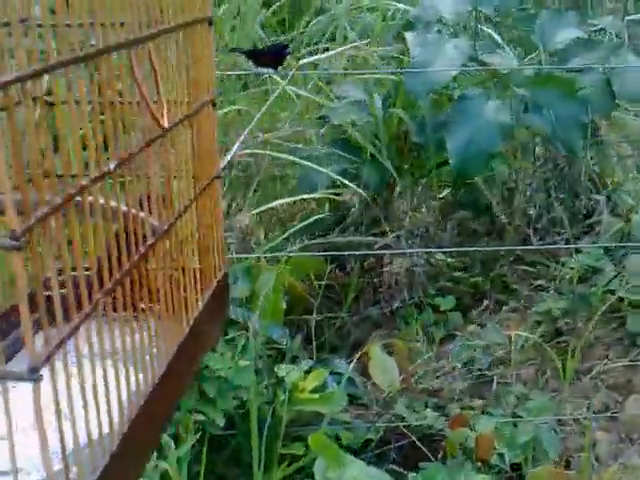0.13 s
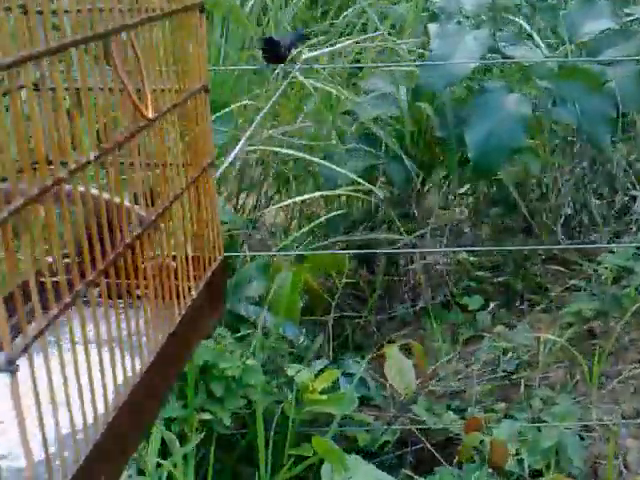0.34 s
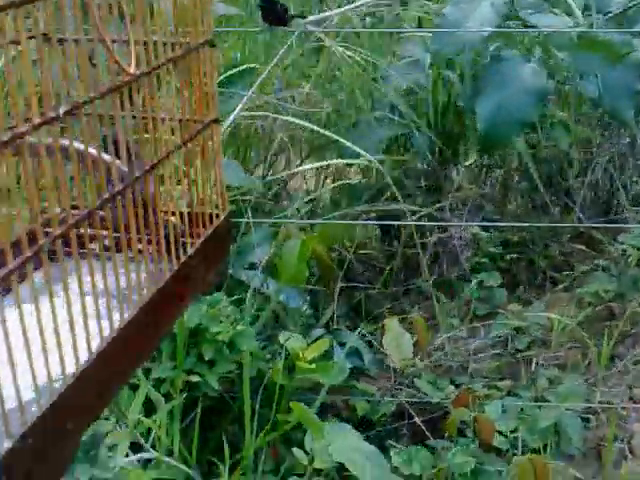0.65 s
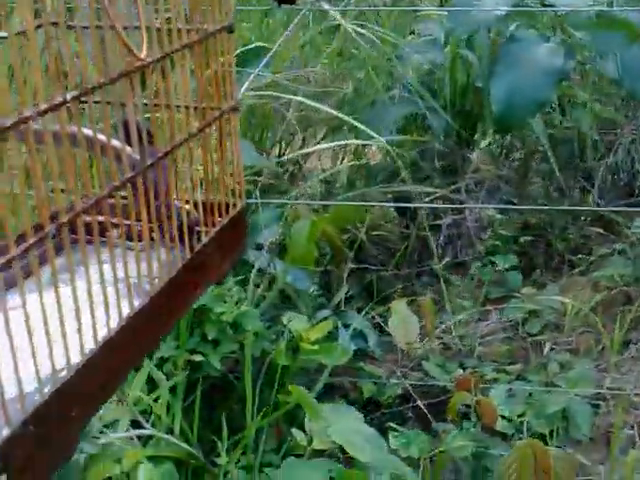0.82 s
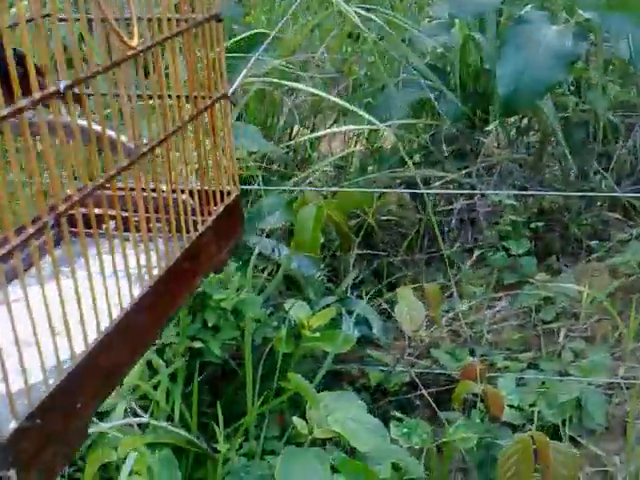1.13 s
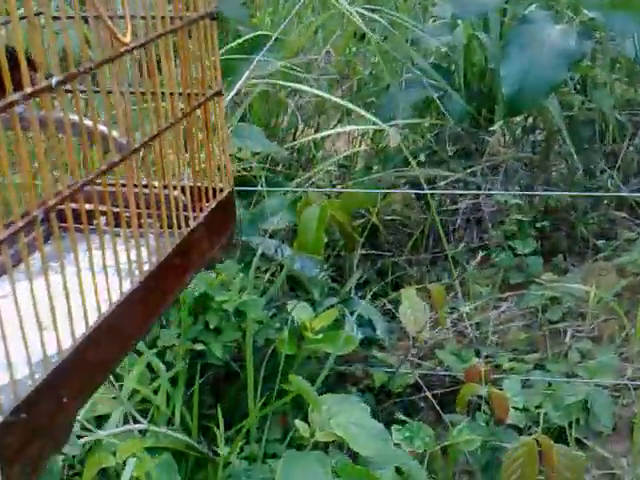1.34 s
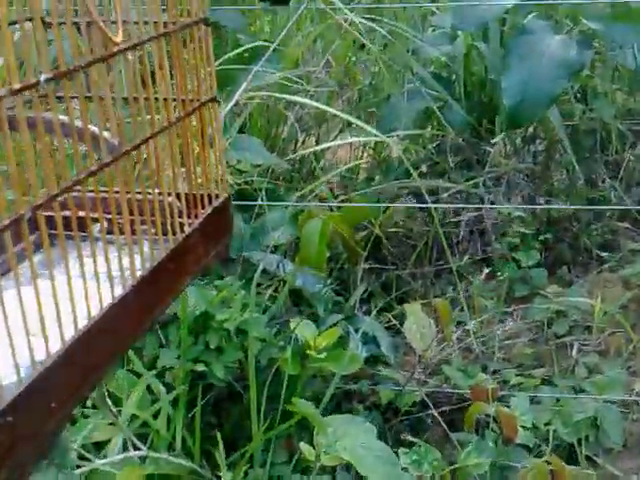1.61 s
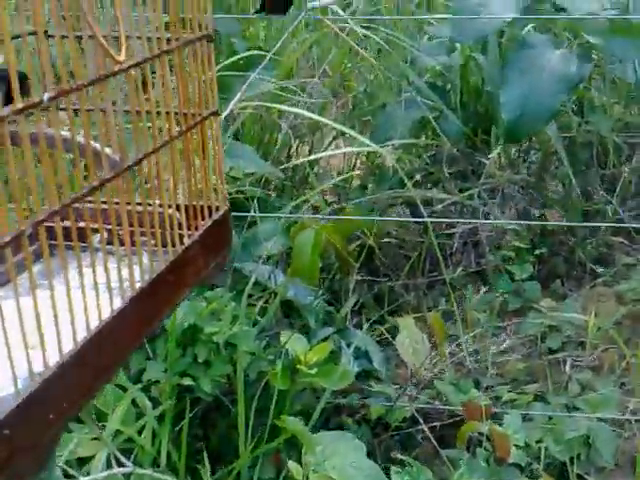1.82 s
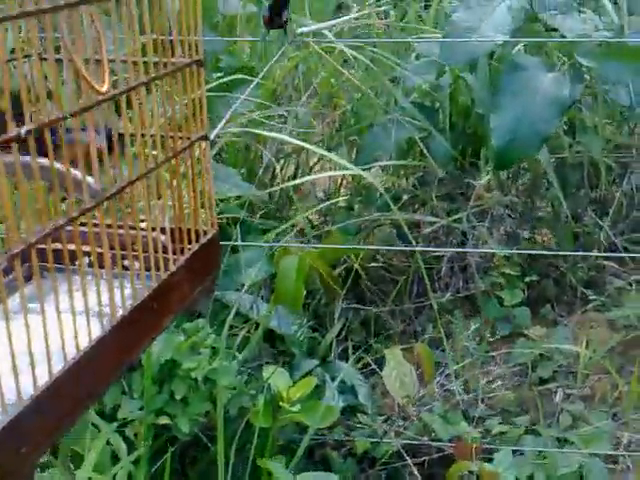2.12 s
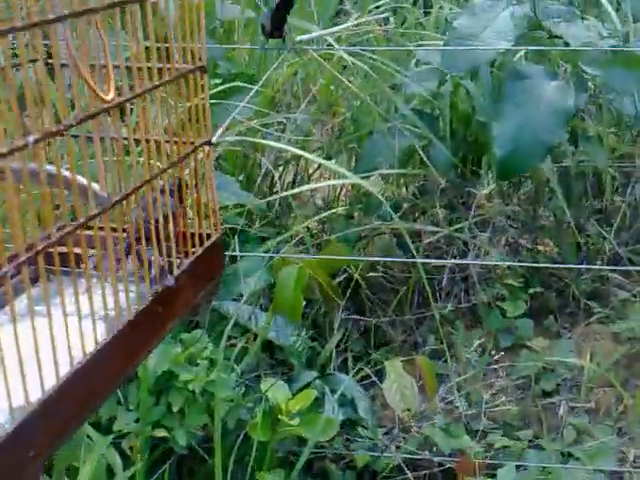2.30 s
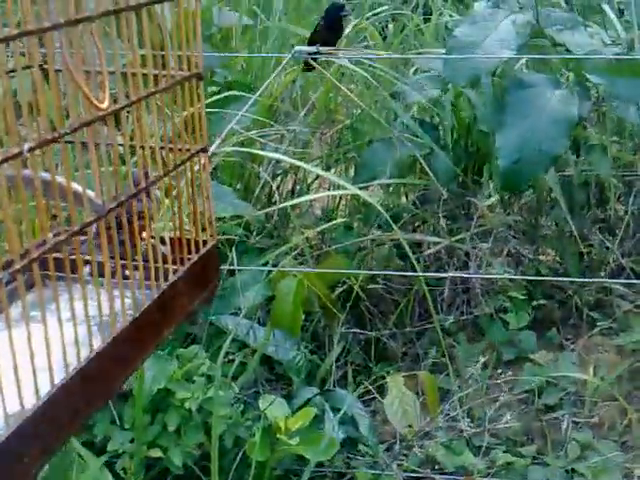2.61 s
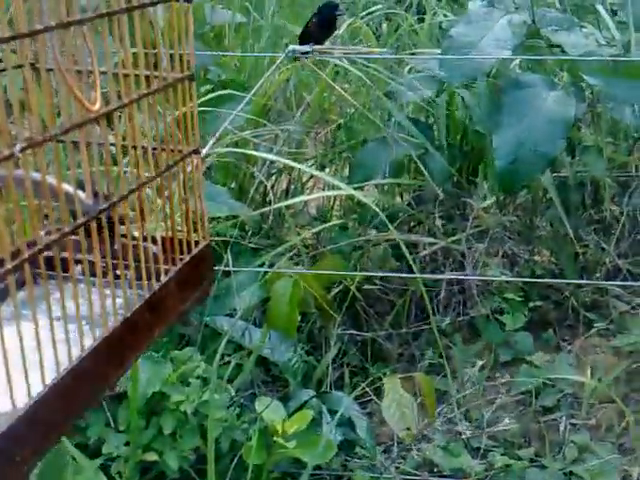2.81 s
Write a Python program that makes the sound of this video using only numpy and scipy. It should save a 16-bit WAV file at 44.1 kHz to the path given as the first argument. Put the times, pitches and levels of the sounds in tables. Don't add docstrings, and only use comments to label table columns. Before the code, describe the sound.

Outdoors in a quiet field, sharp raspy chirps come in bursts of three, four and three, with low wind buffeting after the first, light cage ticks later, faint high whistles and a cricket trill.

```python
import sys
import numpy as np
from scipy import signal
from scipy.fft import rfft, irfft, next_fast_len
from scipy.io import wavfile
from scipy.ndimage import uniform_filter1d, map_coordinates

SR = 44100
rng = np.random.default_rng(int(sys.argv[2]) if len(sys.argv) > 2 else 0)


def wav_out(sig):
    wavfile.write(sys.argv[1], SR, np.round(np.clip(np.atleast_2d(sig).T, -1, 1) * 32767).astype(np.int16))


def natural_amplitude(level_db):
    exponent = np.asarray(level_db, float) / 20
    return 10 ** exponent


N = 130095

# time in seconds, pitch in Hz, buzz level in dB, #
# dulling of the upper partials in dB per octave, level of the leaking air in dB.
FIRST_CHIPS = [
    [(.211, 2190, -30, -4, -20), (.219, 1751, -26.5, 5, -30.5), (.236, 1091, -28.5, 18, -28.5),
     (.25, 774, -33.5, 18, -37), (.264, 488, -48.5, 14, -45)],
    [(.361, 2000, -32, -7, -32), (.379, 1520, -27.5, -5, -26.5), (.393, 1616, -20.5, 7, -27),
     (.399, 1303, -27, -3, -30), (.409, 1265, -34, 11, -28.5), (.42, 808, -35.5, 32, -36),
     (.432, 435, -58, 11, -36)],
    [(.512, 1240, -40, 5, -62), (.52, 1311, -40, 1, -54), (.545, 1160, -30, -4.5, -32),
     (.561, 1532, -24, 28.5, -23.5), (.573, 1016, -34, 18, -27.5), (.592, 584, -57, -3, -38.5)],
]
SECOND_CHIPS = [
    [(1.147, 2110, -32.5, 0.41, -51), (1.158, 1868, -23, 2, -24), (1.168, 1574, -27, 2.3, -26.5),
     (1.187, 1303, -30.5, 0, -31), (1.203, 1410, -34, 0, -32), (1.219, 2060, -38, 1.8, -33.5)],
    [(1.291, 1750, -33, 4, -23), (1.303, 1525, -30.5, 13, -30), (1.311, 1585, -26.5, -5.5, -30),
     (1.337, 1073, -31.5, 1.5, -33.5), (1.355, 984, -32.5, 18, -34), (1.376, 1095, -43.5, 7, -57),
     (1.391, 1960, -39.5, 3, -58)],
    [(1.455, 1458, -42, 0.75, -29.5), (1.473, 1203, -31.5, 0.67, -33), (1.483, 1101, -33.5, 21, -31.5),
     (1.501, 873, -36.5, 30, -34), (1.52, 441, -46.5, 28, -39.5)],
    [(1.609, 1288, -46.5, 6.2, -74), (1.625, 1144, -42.5, 6, -50), (1.64, 1020, -33, 2.9, -34),
     (1.66, 969, -36, 33, -35), (1.668, 699, -42, 22, -33), (1.685, 455, -58, 9.1, -41.5)],
]
THIRD_CHIPS = [
    [(2.319, 1980, -27.5, 2.3, -34), (2.331, 1434, -30.5, 17, -24.5), (2.343, 950, -29.5, 14.5, -31.5),
     (2.362, 468, -50, 17, -44)],
    [(2.464, 2334, -43, -4, -55), (2.473, 1406, -42, -8.5, -55), (2.485, 1150, -42.5, -4, -43),
     (2.497, 949, -27.5, 2, -30.5), (2.514, 825, -32, 11, -34.5), (2.527, 635, -40, 41, -29.5),
     (2.54, 456, -50, 25, -40.5)],
    [(2.634, 1583, -47.5, 2.5, -68), (2.65, 1167, -37, 0.67, -47), (2.666, 1072, -39, 5.1, -31.5),
     (2.68, 1087, -32.5, 19, -27.5), (2.696, 902, -36, 14, -27.5), (2.715, 457, -53.5, 8.6, -37.5)],
]
# time in seconds, half-pitch lines in dB.
BREAKS = [
    (.25, -11),
    (0.395, -6.5),
    (.555, -10.5),
    (1.23, -20),
    (1.399, -20),
    (1.5, -19),
    (1.659, -5.5),
    (2.345, -13),
    (2.525, -12),
    (2.685, -8.5),
]
# time in seconds, peak level in dB.
SNAPS = [
    (0.2096, -16),
    (0.3601, -14),
    (1.1458, -10),
    (1.289, -12),
    (1.4536, -15),
    (2.317, -10),
]
# time in seconds, level in dB.
SEEPING_AIR = [
    [(.26, -44.5), (.36, -40.5)],
    [(.98, -63.5), (1.145, -43)],
    [(1.22, -61), (1.29, -41)],
]
# frequency in Hz, gain in dB.
CAVITY = [(450, 5), (1000, 0), (1700, 8), (3000, -8), (4300, -1), (6300, -4), (8500, -13), (11500, -8)]
# frequency in Hz, level in dB per Hz.
HISS = [(400, -18.5), (2900, -10.5), (3900, -6.5), (6300, -2.5), (8500, -8), (12100, 1), (13700, -9),
        (15500, -9.5)]
# frequency in Hz, gain in dB.
TIGHT_SLIT = [(6500, -6), (9000, 0)]
# time in seconds, pitch in Hz, level in dB.
WHISTLES = [
    [(0, 5800, -68), (.07, 4400, -57.5), (.125, 4005, -72), (.142, 3900, -45), (.3, 3210, -44),
     (.365, 3020, -42.5), (.378, 2950, -62)],
    [(.6, 4550, -59), (.632, 4130, -55), (.641, 4000, -53), (.652, 3880, -44.5), (.704, 3587, -47),
     (.735, 3300, -59), (.752, 2880, -67)],
    [(2.528, 4200, -45), (2.538, 3700, -44), (2.547, 3600, -74)],
    [(2.714, 3800, -47), (2.722, 3650, -43.5), (2.73, 3580, -58)],
    [(2.76, 1460, -78), (2.95, 1620, -74)],
]
# time in seconds, peak level in dB, ring in Hz, second ring in Hz.
TICKS = [(1.256, -34.5, 720, 2950), (1.26, -36, 1480, 4160), (1.276, -33.5, 810, 1570),
         (1.731, -43, 4220, 1800), (1.747, -43, 3260, 1490), (1.811, -42.5, 3930, 1450),
         (1.928, -48, 1500, 4060), (1.95, -42.5, 1250, 2170), (2.055, -29, 1555, 4300),
         (2.131, -39, 1615, 2400), (2.175, -48.5, 1090, 1820), (2.252, -36.5, 1140, 2580),
         (2.287, -37.5, 620, 293), (2.376, -45, 1490, 3870), (2.403, -43, 3200, 3540),
         (2.418, -41.5, 3340, 3930), (2.432, -39.5, 1100, 3100), (2.785, -47, 540, 500),
         (2.842, -48, 3370, 5470)]
# time in seconds, level in dB.
WIND = [(0, -64), (.13, -52.5), (.3, -55), (.42, -38), (.6, -27), (.72, -28), (.78, -36), (.93, -40.5),
        (.98, -33.5), (1.35, -34.5), (1.55, -46), (1.78, -55), (2.1, -65.5), (2.2, -51.5), (2.45, -69.5),
        (2.65, -58.5), (2.95, -61)]
# frequency in Hz, level in dB per Hz.
RUMBLE = [(12, -26), (30, 1), (60, 3.5), (134, -7.5), (290, -27), (700, -41.5), (1200, -100)]
# time in seconds, peak level in dB, length in seconds,
# lean without unit (-1 suck, 0 suck then push, 1 push).
SLAPS = [(.3755, -20.5, 0.0045, -0.63), (.4674, -16, 0.0021, 0.61), (.571, -21, 0.002, 0.85),
         (.579, -17, 0.0031, -1.1), (.6095, -31, 0.0038, -0.36), (.6455, -21, .0017, -0.91),
         (.6528, -21.5, 0.0027, 0.11), (.6665, -16, 0.0024, -0.42), (.674, -21.5, 0.0015, -0.24),
         (.6822, -10.5, 0.0021, -0.015), (.6945, -25.5, 0.007, -1.34), (.8245, -14.5, 0.003, 0.1),
         (.8506, -15.5, 0.0033, 1), (.8567, -18, .003, 0), (.8648, -19, 0.0037, -0.74),
         (.976, -21.5, 0.0021, -0.82), (1.0265, -22.5, 0.0033, .5), (1.0766, -22.5, .0025, -0.36),
         (1.2585, -27.5, 0.0013, -0.58), (1.334, -21.5, 0.0036, -0.11), (1.362, -25, 0.005, -0.25),
         (1.438, -25, 0.0037, -0.057), (1.463, -21.5, 0.0035, -0.76), (1.586, -33, 0.0071, -0.12),
         (2.19, -40.5, 0.0062, 0.15)]
# time in seconds, pitch in Hz, level in dB.
CRICKET = [
    (.45, 7480, -65),
    (.65, 7220, -51.5),
    (.9, 7450, -63.5),
    (1.4, 7520, -63),
    (1.75, 7560, -53.5),
    (2.2, 7525, -45),
    (2.6, 7500, -46),
    (2.95, 7530, -50.5),
]
# frequency in Hz, level in dB.
CHORUS = [(6600, -12), (7350, 22), (8200, -53)]
# frequency in Hz, level in dB per Hz.
HUSH = [(200, -20), (330, -24.5), (620, -29), (1600, -25), (3000, -28), (5400, -28.5), (9000, -30),
        (16000, -31)]
# time in seconds, level in dB.
AIR = [(0, -59), (.2, -55), (1.6, -52.5), (2.95, -56)]


def unit(x):
    return x / np.sqrt(np.mean(x ** 2) + 1e-20)


def along(points, hz):
    f, v = np.transpose(points)
    return np.interp(np.log(hz + 1), np.log(f + 1), v)


def curves(rows):
    s, *cols = np.transpose(rows)
    t = np.arange(N) / SR
    gate = np.clip(np.minimum(t - s[0], s[-1] - t) / 0.00047, 0, 1)
    return [np.interp(t, s, c) for c in cols] + [gate]


def wobble(rate):
    points = rng.standard_normal(int(N * rate / SR) + 4)
    return map_coordinates(points, [np.arange(N) * rate / SR])


def coloured(x, spectrum):
    m = next_fast_len(N + 8192)
    gain = natural_amplitude(along(spectrum, np.fft.rfftfreq(m, 1 / SR)))
    return irfft(rfft(x, m) * gain, m)[:N]


def place(events, shape):
    out = np.zeros(N + SR)
    for row in events:
        v = shape(*row[1:])
        out[round(row[0] * SR):][:len(v)] += v
    return out[:N]


def snap(db):
    t = np.arange(200) / SR
    rise_s = .0003
    signs = np.sign(rng.standard_normal(len(t)))
    return natural_amplitude(db - 4) * signs * t / rise_s * np.exp(1 - t / rise_s)


def chips():
    jitter, ragged, break_s = .0015, 15, .008
    tail_s, glide_s, fade_s = .008, .007, .011
    buzz = np.zeros(N)
    k = np.arange(1, 33)[:, None] / 2
    hiss = rng.standard_normal(N)
    slip, shimmer, sputter = wobble(500), wobble(400), wobble(250)
    fray = 1.5 * np.array([wobble(45) for _ in k])
    puffs = sum(gate * natural_amplitude(db) for db, gate in map(curves, SEEPING_AIR))
    loose = np.ones(N)
    for call, (broken_at, half_db) in zip(FIRST_CHIPS + SECOND_CHIPS + THIRD_CHIPS, BREAKS):
        on = slice(round(call[0][0] * SR), round((call[-1][0] + tail_s) * SR))
        hz, buzz_db, dull_db, hiss_db, gate = [c[on] for c in curves(call)]
        hz = uniform_filter1d(hz, size=round(glide_s * SR), mode="nearest")
        broken = np.clip((np.arange(N)[on] / SR - broken_at) / break_s, 0, 1)
        loose[on] = broken
        turn = 2 * np.pi * np.cumsum(hz * (1 + jitter * slip[on] * (1 + ragged * broken))) / SR

        dulling = dull_db * np.log2(1 + k * hz / 3000)
        gains = natural_amplitude(along(CAVITY, k * hz) - dulling + (2 + broken) * fray[:, on])
        gains = gains / (1 + (k * hz / 13200) ** 20)
        gains = gains / np.sqrt((gains[1:6:2] ** 2).sum(0) / 2)
        gains[::2] = broken * natural_amplitude(half_db) * gains[1::2]
        partials = (gains * np.cos(k * turn + 0.34 * k ** 2)).sum(0)
        buzz[on] += gate * natural_amplitude(buzz_db + .3 * (5 + 12.4 * broken) * shimmer[on]) * partials

        flow = np.clip(np.arange(len(hz))[::-1] / (fade_s * SR), 0, 1)
        puff = flow * natural_amplitude(hiss_db + 1.2 * sputter[on]) * (1 + 0.58 * np.cos(turn))
        puffs[on] = np.maximum(puffs[on], puff)
    leak = puffs * (loose * hiss + (1 - loose) * coloured(hiss, TIGHT_SLIT))
    return buzz + coloured(leak + place(SNAPS, snap), HISS) / np.std(coloured(hiss, HISS))


def finch():
    out = np.zeros(N)
    for note in WHISTLES:
        hz, db, gate = curves(note)
        flutter = 1.5 * wobble(58.2)
        out += gate * natural_amplitude(db + 4 + flutter) * np.sin(2 * np.pi * np.cumsum(hz) / SR)
    return out


def claws():
    t = np.arange(2000) / SR
    rise_s, t60_s = .0012, .011
    shape = natural_amplitude(10 - 60 * t / t60_s) * (1 - np.exp(-t / rise_s))

    def ring(hz):
        blur = .9 * np.cumsum(rng.standard_normal(len(t))) / np.sqrt(rise_s * SR)
        return np.sin(2 * np.pi * hz * t + blur)

    def tick(db, hz, hz2):
        crack = .3 * rng.standard_normal(len(t))
        return natural_amplitude(db) * shape * (ring(hz) + 0.59 * ring(hz2) + crack)

    return place(TICKS, tick)


def wind():
    db, _ = curves(WIND)
    lumps = natural_amplitude(2 * wobble(29.72))
    rumble = unit(coloured(lumps * rng.standard_normal(N), RUMBLE))
    t = np.arange(-1000, 1000) / SR

    def slap(db, s, lean):
        both_ways = 3 * t / s * np.cos(lean * np.pi / 2)
        one_way = np.sin(lean * np.pi / 2)
        return natural_amplitude(db) * (both_ways + one_way) / (1 + (t / s) ** 2) ** 2

    return natural_amplitude(db) * rumble + np.roll(place(SLAPS, slap), -len(t) // 2)


def crickets():
    hz, db, _ = curves(CRICKET)
    strokes = 74.18 * np.arange(N) / SR - .05
    pulse = (.5 + .5 * np.cos(2 * np.pi * strokes)) ** .9
    tone = np.sin(2 * np.pi * np.cumsum(hz + 25 * wobble(150)) / SR)
    far = unit(coloured(rng.standard_normal(N), CHORUS)) * natural_amplitude(-62.5 + 0.28 * wobble(8.1))
    return unit(pulse * tone) * natural_amplitude(db + 0.91 * wobble(70)) + far


def hush():
    db, _ = curves(AIR)
    return natural_amplitude(db + 0.33 * wobble(3.9)) * unit(coloured(rng.standard_normal(N), HUSH))


def echoes(x):
    t = np.arange(SR // 4) / SR
    tail = rng.standard_normal(len(t)) * natural_amplitude(-60 * t / 0.21)
    return natural_amplitude(-22) * signal.fftconvolve(x, tail / np.linalg.norm(tail))[:N]


def scene():
    near = chips() + claws()
    far = finch()
    answer = echoes(near + natural_amplitude(9) * far)
    return (near + far + answer + wind() + crickets() + hush())[None]


def band_limit(x):
    return signal.sosfilt(signal.butter(12, 16980, fs=SR, output="sos"), x)


def record(dry):
    top_hz = 16000
    limit = [(top_hz - 200, 0), (top_hz, -25), (top_hz + 900, -30), (top_hz + 1000, -120)]
    kept = coloured(dry[0], limit)
    return band_limit(kept[None])


dry = scene()
out = record(dry)
wav_out(out)
```